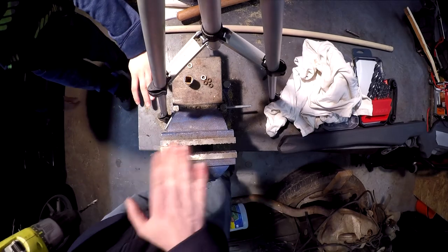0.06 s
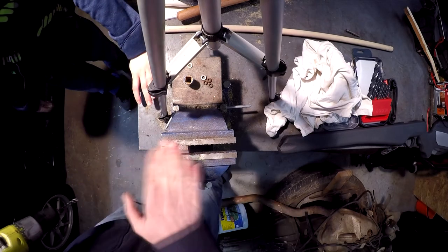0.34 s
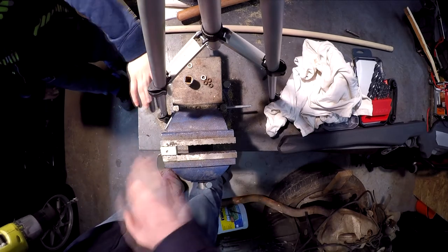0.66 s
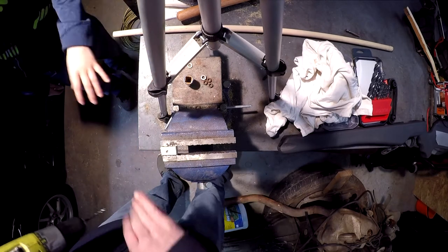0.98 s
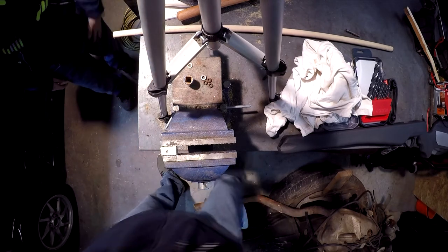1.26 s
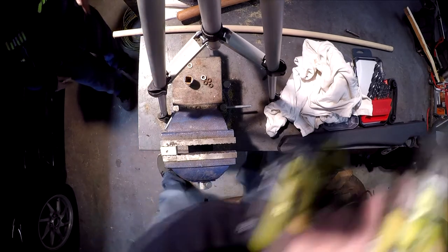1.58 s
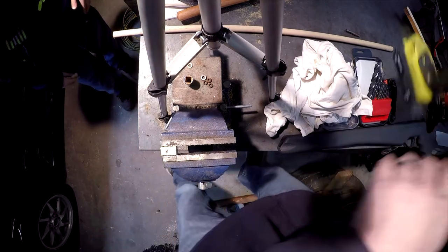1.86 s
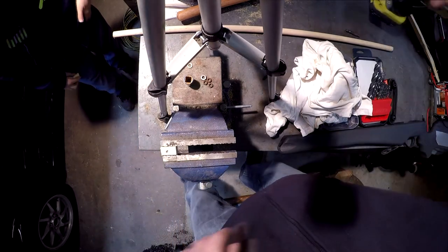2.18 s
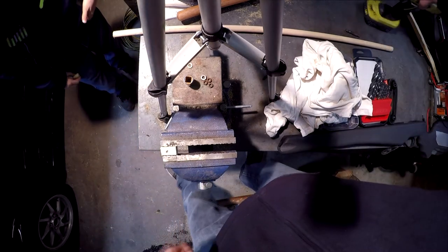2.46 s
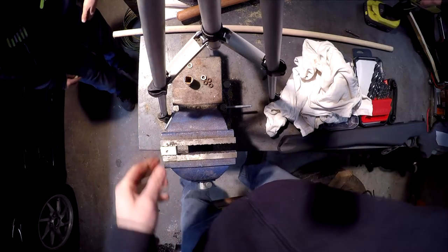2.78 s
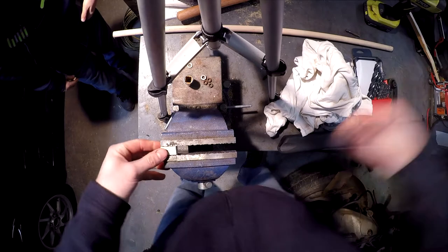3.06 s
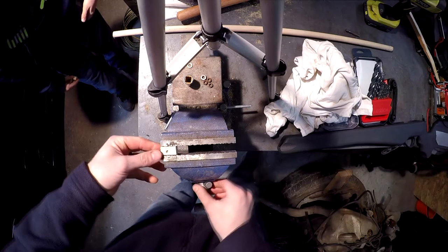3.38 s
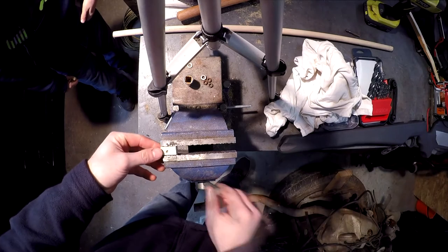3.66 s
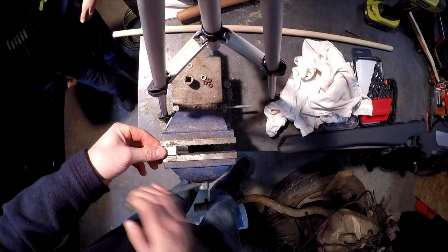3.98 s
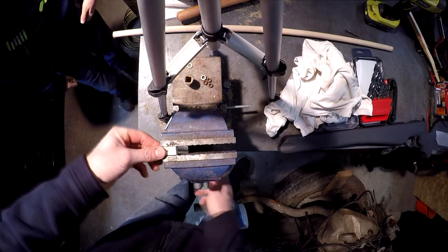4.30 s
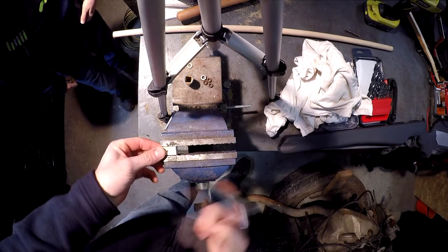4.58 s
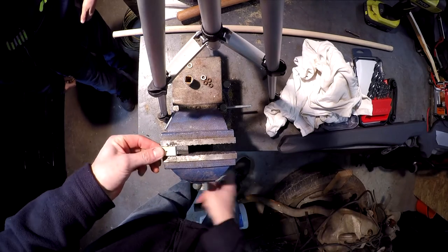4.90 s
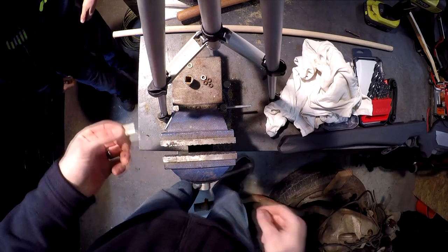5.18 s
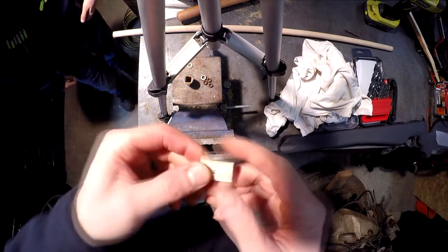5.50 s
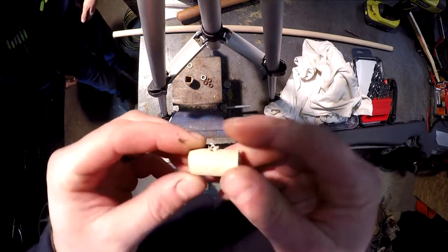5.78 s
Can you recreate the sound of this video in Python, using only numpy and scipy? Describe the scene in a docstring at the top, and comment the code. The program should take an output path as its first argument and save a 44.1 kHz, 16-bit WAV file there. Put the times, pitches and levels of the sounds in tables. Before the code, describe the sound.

Sleeves rustle and a drill is set down on a workbench, then a vise's steel handle slides, clanks and turns with small knocks.

```python
"""Sleeves rustle and a palm pats dust off a bench vise, in a workshop heard from a head-worn camera.
After light taps, a cordless drill is stood on the bench: its case rings and it rocks to rest.
The vise's steel handle slides through its spindle, chatters and hits its stop; then the screw is
turned, grinding and knocking. The heavy bench shudders under the blows and the small room answers."""
import sys
import numpy as np
from scipy import signal
from scipy.fft import rfft, irfft, next_fast_len
from scipy.io import wavfile
from scipy.ndimage import uniform_filter1d, minimum_filter1d, map_coordinates

SR = 44100
rng = np.random.default_rng(int(sys.argv[2]) if len(sys.argv) > 2 else 0)


def pcm_store(signal):
    """Save signal as 16-bit PCM."""
    levels = np.round(np.clip(np.atleast_2d(signal), -1, 1) * 32767)
    wavfile.write(sys.argv[1], SR, levels.astype(np.int16).T)


N = 266317
TIME_S = np.arange(N) / SR
AGE_S = np.arange(SR) / SR  # time since a contact

# room rumble and hiss: freq_hz, level_db
AIR_SPECTRUM = [(12, -34.5), (20, 4), (59, 4.5), (83, -2.5), (161, -13), (259, -16.5), (315, -22.5),
                (465, -20.5), (1160, -32.5), (3000, -31.5), (3450, -34.5), (5530, -35.5), (7520, -40.5),
                (13900, -43), (15500, -56)]
# room decay: freq_hz, t60_s
ROOM_DECAY = [(100, 0.48), (500, 0.63), (1000, 0.39), (2800, 0.46), (5000, 0.46), (8000, 0.45),
              (14000, 0.067)]
# camera housing resonances: freq_hz, width_hz, gain_db
HOUSING_RESONANCES = [(218.5, 41, -10), (608, 90, -10), (1042, 74, 5), (1850, 130, -15), (2880, 290, -7.5)]

# arm movements: peak_s, level_db, rise_s, fall_s
ARM_REACHES = [(0.308, -46, 0.14, 0.15), (1.17, -53.5, 0.14, 0.56), (1.48, -56, 0.16, 0.2),
               (1.679, -54.5, 0.18, .15), (3.1, -63.5, 0.12, 0.31), (3.64, -44, 0.59, 0.26),
               (4.75, -69, 0.27, 0.31), (5.15, -60.5, 0.23, 0.3), (5.68, -66.5, .2, 0.39),
               (6.03, -57.5, 0.1, .1)]
# sliding cloth: freq_hz, level_db
CLOTH_SPECTRUM = [(150, -3), (500, 9.5), (1000, -6), (1700, -2), (2700, 0), (3300, -5), (4200, 1.5),
                  (6000, -3.5), (8000, -13), (12000, -18.5), (15500, -20)]
# swishes of hand, cuff and tool: peak_s, length_s, level_db, pitch_hz, half_width_oct
HAND_SWISHES = [(0.02, 0.19, -61, 1400, 1), (0.27, 0.17, -58, 2400, 0.55), (0.316, 0.058, -60, 7980, 0.69),
                (1.735, 0.12, -51.5, 4650, 0.47), (1.785, 0.22, -61, 4600, 0.39),
                (1.736, 0.12, -55.5, 2620, 0.19), (3.111, .14, -65.5, 6960, .8),
                (3.302, 0.53, -57, 258, 0.39), (3.45, .2, -58.5, 7570, 0.8)]
# rustle reflected by nearby surfaces: delay_s, gain_db
RUSTLE_ECHOES = [(.0011, -24.5), (.0029, -17), (.0052, -11)]

# palm on the vise: start_s, thud_db, brush_db
PALM_PATS = [(.085, -36.5, -51), (0.394, -35, -55), (.627, -36.5, -51.5), (0.921, -39, -56)]
# palm thud: freq_hz, level_db
THUD_SPECTRUM = [(25, 10), (60, 9.5), (130, -3), (200, -10), (320, -44), (700, -47), (2000, -90)]
# brushing skin: freq_hz, level_db
SKIN_SPECTRUM = [(200, -6.5), (600, 15), (1250, -2.5), (2000, -4.5), (5000, -10), (9000, -21), (12000, -7),
                 (15000, -22)]

# knocks on the vise: start_s, steel_db, cutoff_hz, t60_ratio, thump_db, crack_db
VISE_KNOCKS = [(0.7502, -42.5, 1600, 0.76, -61, -52.5), (3.7675, -28, 3900, 0.9, -61, -14.5),
               (3.772, -14, 4670, 0.95, -25, -14.5), (3.8496, -23.5, 1900, 0.41, -30, -40),
               (4.119, -30, 930, 0.53, -36, -49.5), (4.229, -34.5, 1440, 0.63, -45.5, -57),
               (4.631, -44, 965, 0.3, -53, -56), (4.778, -43, 985, 0.3, -48.5, -74),
               (4.797, -33, 840, 0.18, -52, -79), (4.955, -45, 800, 0.66, -40, -71),
               (5.079, -29.5, 970, 0.39, -62.5, -44), (5.087, -37, 960, 0.5, -70, -42.5),
               (5.163, -32.5, 1500, 0.54, -46, -52), (5.324, -46.5, 1300, 0.67, -60.5, -53),
               (5.333, -33.5, 870, 0.39, -55, -82)]
# vise body: freq_hz, level_db, t60_s
VISE_MODES = [(159.3, -16.5, 0.29), (210, -18, 0.095), (382.5, -12, 0.21), (464, -1.5, 0.15),
              (516.3, -8, 0.27), (591.5, 2, 0.13), (629.6, 3, 0.17), (670, -11, 0.13), (763, -15, 0.23),
              (924.5, 0.5, 0.1), (956, -5.5, 0.2), (1066, -1.5, 0.09), (1103, -18.5, 0.19),
              (1336, -18.5, 0.22), (1583, -14, 0.13), (1777, -13.5, 0.114), (1820, -18.5, 0.12)]
# thin steel handle: freq_hz, level_db, t60_s
HANDLE_MODES = [(2580, -27.5, .25), (2890, -23, 0.19), (2874, -22, 0.17), (3650, -19.5, 0.22),
                (3660, -24.5, .25), (4000, -24, 0.12), (4130, -27, 0.091), (4240, -22, 0.2),
                (4730, -37.5, .28), (5100, -22.5, .35), (7000, -17.5, 0.28)]
# contact crack on steel: freq_hz, level_db
STEEL_CRACK_SPECTRUM = [(100, 11), (600, 3), (1100, -4), (1300, -1.5), (1800, 3), (2200, -3), (2800, 1),
                        (3400, -7), (4200, 2), (5000, -2.5), (5700, -10.5), (9500, -18.5), (12500, -18.5),
                        (15000, -26.5)]
# bench sway and boom: freq_hz, level_db, t60_s
BENCH_MODES = [(25.24, -2, 1.3), (30.05, -7.5, 1), (42.1, -9, 0.26), (57.6, 0.5, 0.49), (80.9, 2, .25),
               (113.3, -4.5, 0.5), (163.3, -10, 0.68), (189, -11.5, 0.49)]
# hard knocks shoving the vise on its mount: start_s, level_db
MOUNT_SHOVES = [(3.7709, -16.5), (4.119, -39.5), (5.164, -47.5), (5.336, -47.5)]

# taps, bumps and clicks of handled things: start_s, level_db, pitch_hz, half_width_oct, t60_s
HANDLING_TAPS = [(1.182, -45, 6050, 1.1, 0.023), (1.231, -48, 4000, 0.66, 0.088),
                 (1.64, -41, 4760, 0.7, 0.017), (1.688, -38.5, 3760, 0.92, 0.17),
                 (2.1217, -38, 4800, 0.55, 0.008), (3.589, -35, 860, 0.93, 0.038),
                 (3.625, -29, 1410, 0.1, 0.053), (4.962, -42, 147, 0.356, 0.2),
                 (5.085, -47, 3920, 0.74, 0.087), (5.086, -52, 6500, 0.17, 0.12),
                 (5.163, -38, 1444, 0.22, 0.083), (5.607, -46, 386, 0.69, 0.043)]
# drill and vise handle being shifted: start_s, level_db, pitch_hz, t60_s
HOLLOW_TOCKS = [(1.6784, -33.5, 1190, .034), (2.2499, -30, 700, 0.005), (2.286, -23.5, 550, 0.0065),
                (4.243, -33, 1118, 0.062), (4.9552, -22, 527, 0.028)]

# drill landing and rocking: start_s, case_db, thump_db, crack_db
DRILL_CONTACTS = [(2.4744, -35.5, -38.5, -21), (2.478, -7.5, -21.5, -18), (2.494, -26.5, -31, -24.5),
                  (2.518, -47, -27, -45)]
# rubber foot taking the weight: peak_s, length_s, level_db, pitch_hz
FOOT_PUNCHES = [(2.4803, .0042, -4.5, 545), (2.4853, .004, -11, 700), (2.505, .005, -16, 620),
                (2.5212, .004, -18, 650)]
# drill case on the bench: freq_hz, level_db, t60_s
CASE_MODES = [(523, 4.5, 0.029), (373.4, -12.5, 0.21), (442, -1, 0.081), (486.4, -3.5, 0.12),
              (504.6, -10.5, 0.16), (628, -10.5, 0.28), (697, -1, 0.11), (762, -10, 0.055),
              (809, -15, 0.093), (845, -13.5, .08), (924, -15, .14), (1043, -15, 0.12), (1103, -9, 0.13),
              (1430, -26.5, .14), (1640, -24, 0.1), (2603, -31.5, 0.29)]
# contact crack of the case: freq_hz, level_db
CASE_CRACK_SPECTRUM = [(100, 12), (300, 8.5), (600, 6.5), (1100, -5.5), (1300, -3.5), (1800, -4),
                       (2200, -2.5), (2800, -2.5), (3400, -8), (4300, -8.5), (5500, -13), (7500, -27),
                       (11000, -31.5), (15000, -33)]

# steel on steel, the handle first, then the screw: start_s, length_s, level_db
STEEL_SLIDES = [(3.58, 0.12, -32.5), (3.72, .56, -53), (4.468, .11, -53.5), (4.659, 0.27, -53),
                (5.001, 0.2, -53.5)]
# spindle resonances: freq_hz, width_hz, gain_db
SPINDLE_RESONANCES = [(205.5, 74, -16.5), (432, 140, -7.5), (598, 83, 4), (1017, 132.4, -8.5),
                      (1066, 25, -7.5), (1404, 77, -11.5), (1690, 210, -21), (2630, 560, -24.5)]
# chatter of sliding steel: peak_s, length_s, level_db, pitch_hz
SLIDE_CHATTER = [(3.651, .018, -23, 620), (3.688, .04, -22.5, 612), (5.112, .06, -40, 650)]
# screw grinding in its thread: peak_s, length_s, level_db
SCREW_GRINDS = [(4.588, 0.069, -48.5), (4.737, 0.16, -51.5), (5.024, 0.35, -60.5)]


def amp(db):
    """Decibels to gain."""
    return 10 ** (np.asarray(db) / 20)


def unit(x):
    """Scale to rms 1."""
    return x / np.sqrt(np.mean(x ** 2) + 1e-20)


def along(points, hz):
    """Interpolate (freq_hz, value) points on a log axis."""
    freqs_hz, values = np.transpose(points)
    return np.interp(np.log(hz + 1), np.log(freqs_hz), values)


def add(track, start_s, sound):
    """Mix a sound into the track."""
    part = track[round(start_s * SR):][:len(sound)]
    part += sound[:len(part)]


def fade(t60_s):
    """Exponential decay, 60 dB in t60_s."""
    return np.exp(-np.log(1000) * AGE_S / t60_s)


def burst(t60_s):
    """Contact envelope: quick rise, then decay."""
    return fade(t60_s) * (1 - np.exp(-AGE_S / 0.00091))


def swell(peak_s, length_s):
    """Bell-shaped envelope."""
    return np.exp(-(2 * (TIME_S - peak_s) / length_s) ** 2)


def wobble(rate_hz):
    """Smooth random curve, rate_hz knots a second."""
    return map_coordinates(rng.standard_normal(int(N * rate_hz / SR) + 4), [TIME_S * rate_hz])


def noise(response, size=N):
    """Noise of rms 1, coloured by a frequency response."""
    n_fft = next_fast_len(size)
    spectrum = rfft(rng.standard_normal(n_fft)) * response(np.fft.rfftfreq(n_fft, 1 / SR))
    return unit(irfft(spectrum, n_fft)[:size])


def hiss(spectrum, size=N):
    """Noise of rms 1 with a (freq_hz, level_db) spectrum."""
    return noise(lambda f: amp(along(spectrum, f)), size)


def band(hz, half_width_oct, size=N):
    """Noise of rms 1 around one pitch."""
    return noise(lambda f: 1 / (1 + (np.log2((f + 1) / hz) / half_width_oct) ** 6), size)


def resonance(f, hz, width_hz):
    """Causal response of one resonance, 1 at its peak."""
    return 1j * f * width_hz / (hz * hz - f * f + 1j * f * width_hz)


def filtered(x, response):
    """Apply a complex frequency response."""
    n_fft = next_fast_len(N + SR)
    return irfft(rfft(x, n_fft) * response(np.fft.rfftfreq(n_fft, 1 / SR)), n_fft)[..., :N]


def ring(modes, attack_s, cutoff_hz=np.inf, t60_ratio=1, scatter_db=0, detune=0):
    """Damped modes, varied per strike by scatter_db and detune; soft contacts omit the high ones."""
    tone = np.zeros(SR)
    for hz, db, t60_s in modes:
        level_draw, pitch_draw = rng.standard_normal(2)
        gain = amp(db + scatter_db * level_draw) / np.sqrt(1 + (hz / cutoff_hz) ** 6)
        pitch_hz = hz * (1 + detune * pitch_draw)
        tone += gain * fade(t60_s * t60_ratio) * np.sin(2 * np.pi * pitch_hz * AGE_S)
    return tone * (1 - np.exp(-AGE_S / attack_s))


def in_room(x, wet_db):
    """Add a fresh diffuse tail, each frequency dying at its own rate."""
    hz, time_s, spectra = signal.stft(rng.standard_normal(SR * 3 // 4), SR, nperseg=256)
    decay = np.exp(-np.log(1000) * time_s / along(ROOM_DECAY, hz)[:, None])
    _, tail = signal.istft(spectra * decay, SR, nperseg=256)
    tail *= 1 - np.exp(-AGE_S[:len(tail)] / 0.0017)
    return x + amp(wet_db) * signal.fftconvolve(x, tail / np.linalg.norm(tail))[:len(x)]


def room_air():
    """Low rumble and faint hiss, wavering slightly."""
    return amp(-50) * hiss(AIR_SPECTRUM) * amp(0.53 * wobble(rate_hz=6.6))


def reach(peak_s, rise_s, fall_s):
    """Arm speed envelope: up 20 dB per rise_s, then down 20 dB per fall_s."""
    return 10 ** -np.maximum((peak_s - TIME_S) / rise_s, (TIME_S - peak_s) / fall_s)


def sleeves(idle_db=-71.5):
    """Cloth slides and swishes as the arms move; its fibres catch in tiny grains."""
    reach_power = sum((amp(db) * reach(peak_s, rise_s, fall_s)) ** 2
                      for peak_s, db, rise_s, fall_s in ARM_REACHES)
    rustle = np.sqrt(amp(idle_db) ** 2 + reach_power) * hiss(CLOTH_SPECTRUM)
    for peak_s, length_s, db, hz, half_width_oct in HAND_SWISHES:
        rustle += amp(db) * swell(peak_s, length_s) * band(hz, half_width_oct)
    grains = unit(amp(1.1 * wobble(rate_hz=35) + 2 * wobble(rate_hz=700)))
    echoes = lambda f: 1 + sum(amp(db) * np.exp(-2j * np.pi * f * delay_s)
                               for delay_s, db in RUSTLE_ECHOES)
    return amp(-0.5) * filtered(rustle * grains, echoes)


def palm_pats(brush_rise_s=0.012):
    """A soft palm thuds on the vise without ringing it and brushes across."""
    out = np.zeros(N)
    stroke = AGE_S / brush_rise_s * np.exp(1 - AGE_S / brush_rise_s)
    for start_s, thud_db, brush_db in PALM_PATS:
        thud = amp(thud_db) * hiss(THUD_SPECTRUM, SR) * burst(t60_s=0.48)
        brush = amp(brush_db) * hiss(SKIN_SPECTRUM, SR) * stroke
        add(out, start_s, thud + in_room(brush, wet_db=-5))
    return out


def vise_knocks(mount_hz=217, mount_t60_s=0.15):
    """Each knock rings vise and handle, cracks at the contact and shakes the bench."""
    out = np.zeros(N)
    for start_s, steel_db, cutoff_hz, t60_ratio, thump_db, crack_db in VISE_KNOCKS:
        grip = max(1 - t60_ratio, 0)  # a firm grip damps and shifts the modes
        steel = amp(steel_db) * ring(VISE_MODES + HANDLE_MODES, attack_s=0.0033, cutoff_hz=cutoff_hz,
                                     t60_ratio=t60_ratio, scatter_db=2, detune=0.041 * grip)
        # soft contacts crack duller
        colour = lambda f: amp(along(STEEL_CRACK_SPECTRUM, f)) / (1 + (f / (7 * cutoff_hz)) ** 4)
        crack = amp(crack_db) * noise(colour, SR) * burst(t60_s=0.057)
        add(out, start_s, in_room(steel, wet_db=-21) + in_room(crack, wet_db=-5))
        add(out, start_s, amp(thump_db) * ring(BENCH_MODES, attack_s=0.0084))
    for start_s, db in MOUNT_SHOVES:
        add(out, start_s, ring([(mount_hz, db, mount_t60_s)], attack_s=0.0013))
    return out


def taps():
    """Small contacts, each a burst of noise in one band."""
    out = np.zeros(N)
    for start_s, db, hz, half_width_oct, t60_s in HANDLING_TAPS:
        tap = amp(db) * band(hz, half_width_oct, SR) * burst(t60_s)
        add(out, start_s, in_room(tap, wet_db=-10))
    return out


def tocks():
    """Light contacts, each ringing one quickly damped mode."""
    out = np.zeros(N)
    for start_s, db, hz, t60_s in HOLLOW_TOCKS:
        tock = ring([(hz, db, t60_s)], attack_s=0.0008)
        add(out, start_s, in_room(tock, wet_db=-13.5))
    return out


def drill_landing():
    """One edge touches, the weight comes down on the rubber foot, the drill rocks to rest."""
    out = sum(amp(db) * swell(peak_s, length_s) * np.cos(2 * np.pi * hz * (TIME_S - peak_s))
              for peak_s, length_s, db, hz in FOOT_PUNCHES)
    for start_s, case_db, thump_db, crack_db in DRILL_CONTACTS:
        case = amp(case_db) * ring(CASE_MODES, attack_s=0.0032, scatter_db=3)
        crack = amp(crack_db) * hiss(CASE_CRACK_SPECTRUM, SR) * burst(t60_s=0.055)
        add(out, start_s, in_room(case, wet_db=-18.5) + in_room(crack, wet_db=-4.5))
        add(out, start_s, amp(thump_db) * ring(BENCH_MODES, attack_s=0.0086))
    return out


def slide(start_s, length_s, attack_s=0.032, t60_s=0.22):
    """Slide envelope: attack, hold while the steel moves, release."""
    attack = np.clip((TIME_S - start_s) / attack_s, 0, 1)
    stopped_s = np.maximum(TIME_S - start_s - length_s, 0)
    return attack * np.exp(-np.log(1000) * stopped_s / t60_s)


def vise_friction():
    """Uneven slips excite the spindle; at times the steel locks into a short chatter."""
    spindle = lambda f: sum((-1) ** k * amp(db) * resonance(f, hz, width_hz)
                            for k, (hz, width_hz, db) in enumerate(SPINDLE_RESONANCES))
    sliding = sum(amp(db) * slide(start_s, length_s) for start_s, length_s, db in STEEL_SLIDES)
    out = sliding * unit(noise(spindle) * amp(2.7 * wobble(rate_hz=110)))
    drift_rad = 0.5 * wobble(rate_hz=70)
    for peak_s, length_s, db, hz in SLIDE_CHATTER:
        arch = np.cos(np.pi * np.clip((TIME_S - peak_s) / length_s, -0.5, 0.5))
        out += amp(db) * arch * np.sin(2 * np.pi * hz * TIME_S + drift_rad)
    return out


def screw_grind():
    """The turning screw grumbles low in the vise body."""
    turning = sum(amp(db) * swell(peak_s, length_s) for peak_s, length_s, db in SCREW_GRINDS)
    return turning * band(hz=189, half_width_oct=0.22) * unit(amp(1.7 * wobble(rate_hz=45)))


def scene():
    """Handling sounds, coloured by the camera housing, over the room air; mono."""
    tools = drill_landing() + vise_knocks() + vise_friction() + screw_grind()
    handling = tools + taps() + tocks() + palm_pats() + sleeves()
    housing = lambda f: 1 + sum(amp(db) * resonance(f, hz, width_hz)
                                for hz, width_hz, db in HOUSING_RESONANCES)
    return (amp(-1.21) * filtered(handling, housing) + room_air())[None]


def record(dry, ceiling=0.92, hold_s=0.006, top_hz=15400):
    """The camera's peak limiter, then its band limit."""
    hold_samples = round(hold_s * SR)
    needed_gain = np.minimum(1, ceiling / (np.abs(dry) + 1e-9))
    gain = uniform_filter1d(minimum_filter1d(needed_gain, 2 * hold_samples), hold_samples)
    return filtered(dry * gain, lambda f: f < top_hz)


dry = scene()
out = record(dry)
pcm_store(out)
```